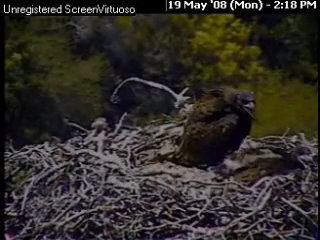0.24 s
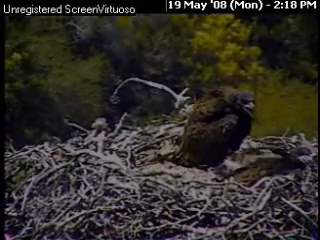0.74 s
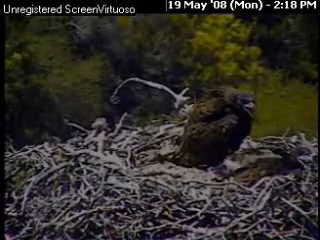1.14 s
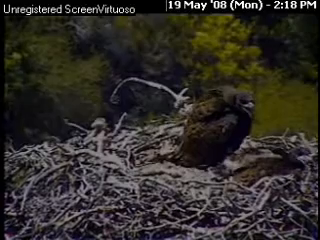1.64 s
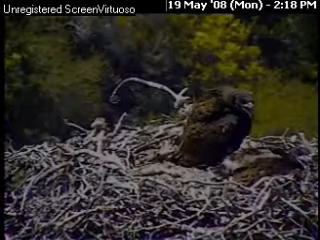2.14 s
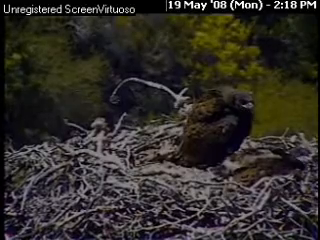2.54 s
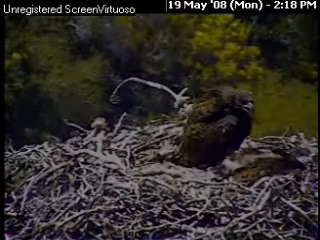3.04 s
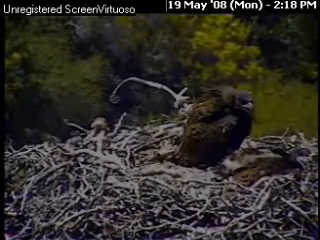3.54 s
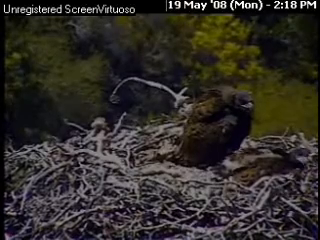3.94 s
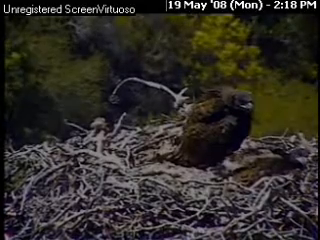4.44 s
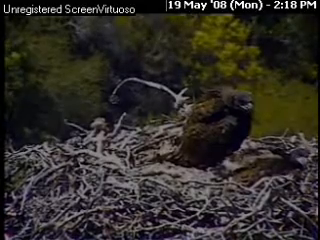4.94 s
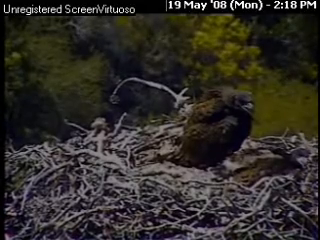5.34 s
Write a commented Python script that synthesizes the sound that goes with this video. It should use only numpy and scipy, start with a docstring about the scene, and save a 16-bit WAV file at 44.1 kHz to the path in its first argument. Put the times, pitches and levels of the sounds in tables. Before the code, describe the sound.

Two eaglets beg with soft gliding whistles and loud, cracking screams, while little birds chirp faintly and airy outdoor noise continues.

```python
"""Two young eagles beg close to a microphone: soft gliding whistles first, then a loud bird's rising screams
(pitch curves with a weak octave), with rasps (tone plus chaotic flutter), cracks and a lingering top note.
The stream stutters in the first two seconds; a last scream comes after 4 s. Between screams small birds
slur and arch (pitch sweeps) and the nest knocks (narrow noise); near the end a thin note and upward hooks.
Blurred far calls waver throughout, over filtered-noise rush and bird blur. A limiter flattens peaks."""
import sys
import numpy as np
from scipy import signal
from scipy.fft import rfft, irfft, next_fast_len
from scipy.io import wavfile
from scipy.ndimage import uniform_filter1d

SR = 44100
rng = np.random.default_rng(int(sys.argv[2]) if len(sys.argv) > 2 else 0)


def digitize_waveform(pressure):
    """Quantize a signal to 16-bit integers and store it at the path in sys.argv[1].

    Rows of a 2-D input are taken as channels; values are limited to [-1, 1].
    """
    field = np.atleast_2d(pressure).T
    bounded = np.clip(field, -1, 1)
    quanta = np.round(bounded * 32767).astype(np.int16)
    wavfile.write(sys.argv[1], SR, quanta)


N = 246078
TIME = np.arange(N) / SR


def gain_of(db):
    """Decibels to amplitude."""
    return 10 ** (np.asarray(db) / 20)


def evened(x):
    """Scales to rms 1."""
    return x / np.sqrt(np.mean(abs(x) ** 2) + 1e-20)


def read(points, hz):
    """Reads a table on a log-frequency axis."""
    f, value = np.transpose(points)
    return np.interp(np.log(hz + 1), np.log(f), value)


def add(mix, start_s, sound):
    """Mixes a sound in at its start time."""
    part = mix[max(round(start_s * SR), 0):][:len(sound)]
    part += sound[:len(part)]


def clock(length_s):
    """Sample times of a sound in seconds, and its progress from 0 to 1."""
    t = np.arange(max(int(length_s * SR), 2)) / SR
    return t, t / t[-1]


def wander(size, rate_hz):
    """Smooth random motion of rms about 1, up to about the given rate."""
    span = next_fast_len(size + 8192)
    low_pass = np.exp(-(np.fft.rfftfreq(span, 1 / SR) / rate_hz) ** 2)
    motion = irfft(rfft(rng.standard_normal(span)) * low_pass, span)
    return evened(motion)[:size]


def angle_of(hz):
    """Running phase of a pitch curve."""
    return 2 * np.pi * np.cumsum(hz) / SR


def fade(size, edge_s):
    """Soft start and end."""
    return signal.windows.tukey(size, min(1, 2 * edge_s * SR / size))


RASP_STEAL = 2.4  # nepers lost by the scream per unit of smoothed rasp amplitude


def eaglets():
    """Rasps steal air from the screams; cracks and soft whistles add freely."""
    rasping = rasps()
    rasp_amplitude = uniform_filter1d(abs(rasping), size=300)
    return screams() * np.exp(-RASP_STEAL * rasp_amplitude) + rasping + cracks() + soft_whistles()


# The loud eaglet's screams, one curve each. Each row: time in seconds, pitch in Hz, level in dB.
SCREAM_CURVES = [
    [(0.42, 3878, -28.5), (0.43, 3916, -15), (0.65, 4096, -6), (0.724, 4168, -5.5), (0.748, 4027, -18.5),
     (0.79, 4112, -0.5), (0.912, 4136, -10), (0.932, 4152, -4), (1.118, 4217, -5), (1.176, 4183, -4),
     (1.19, 4086, -11.5)],
    [(1.79, 3780, -29), (1.842, 3820, -19.5), (1.986, 3758, -23), (2.03, 3920, -13.5), (2.212, 4006, -15.5),
     (2.244, 4083, -9.5), (2.3, 4144, -23), (2.33, 4080, -6.5), (2.37, 4140, -13), (2.49, 4186, -2),
     (2.51, 4164, -14.5)],
    [(4.16, 3932, -21), (4.178, 3940, -20), (4.226, 3940, -18), (4.246, 3890, -25), (4.316, 3976, -18.5),
     (4.344, 3954, -22.5), (4.408, 4070, -8), (4.544, 4138, -16.5), (4.556, 4173, -9.5), (4.57, 4120, -17)],
]
SCREAM_RISE_S = .02


def screams():
    """The loud syrinx driven hard: near-pure tones along pitch and level curves."""
    out = np.zeros(N)
    for curve in SCREAM_CURVES:
        s, hz, db = np.transpose(curve)
        t = np.arange(s[0], s[-1], 1 / SR)
        tone = whistle(np.interp(t, s, hz), np.interp(t, s, db), jitter=0.0017, shimmer=0.12, fuzz_db=-46,
                       octave_db=-1)
        add(out, s[0], tone * np.minimum((t - s[0]) / SCREAM_RISE_S, 1))
    return out


# The voice breaks into a second, rough note. Each row: start in seconds, end in seconds, first pitch in Hz,
# last pitch in Hz, level in dB, roughness 0-1 (before the rough edges are added).
RASP_NOTES = [(0.276, 0.423, 3344, 3486, -32.5, 0.23), (0.489, 0.569, 3530, 3620, -33, 0.5),
              (0.681, 0.783, 3760, 3514, -18, 0.1), (0.824, 0.868, 3640, 3730, -19, 0.5),
              (0.888, 0.92, 3660, 3660, -15, 0), (1.043, 1.129, 3675, 3764, -15, 0.17),
              (1.779, 1.87, 3468, 3667, -25, 0.42), (1.875, 2.042, 3524, 3630, -32.5, .9),
              (2.035, 2.235, 3350, 3670, -43.5, 0.1), (4.152, 4.254, 3640, 3680, -28.5, 0.42),
              (4.23, 4.343, 3770, 3690, -25.5, 0.17), (4.284, 4.385, 3420, 3655, -33, 0.1)]
RASP_WIDTH_HZ = 190  # rate of the chaotic flutter
RASP_SAG_HZ = 79.5  # midway through the note
RASP_EDGE_S, RASP_EDGE_ROUGH = 0.0066, 0.27  # extra roughness as the note breaks in and out


def rasps():
    """All the second notes of the breaking voice."""
    out = np.zeros(N)
    for row in RASP_NOTES:
        add(out, row[0], rasp(*row))
    return out


def rasp(start_s, end_s, first_hz, last_hz, db, rough, octave_db=-28):
    """The second side of the syrinx joins in, part tone and part chaotic flutter."""
    t, u = clock(end_s - start_s)
    n = len(t)
    edge = np.exp(-np.minimum(t, t[::-1]) / RASP_EDGE_S)
    rough = np.clip(rough + RASP_EDGE_ROUGH * edge, 0, 1)
    hz = first_hz + (last_hz - first_hz) * u - RASP_SAG_HZ * np.sin(np.pi * u)
    turn = np.exp(1j * angle_of(hz * (1 + .008 * wander(n, rate_hz=90))))
    chaos = evened(wander(n, RASP_WIDTH_HZ) + 1j * wander(n, RASP_WIDTH_HZ))
    voice = turn * (np.sqrt(1 - rough) + np.sqrt(rough) * chaos)
    sound = evened((voice + gain_of(octave_db) * voice ** 2).real)  # squaring doubles the pitch
    return gain_of(db) * sound * fade(n, edge_s=0.0017)


# The voice collapses as a scream ends.
# Each row: start in seconds, length in seconds, first pitch in Hz, first level in dB.
CRACK_NOTES = [(1.186, 0.049, 3620, -16), (2.509, .072, 3745, -10.5), (4.557, .09, 4025, -15.5)]


def cracks():
    """The failing voice: trembling, fuzzy tones that drop and fade."""
    out = np.zeros(N)
    for s, length_s, hz, db in CRACK_NOTES:
        add(out, s, whistle(*drop(length_s, hz, db), jitter=.012, shimmer=.3, fuzz_db=-20, octave_db=4))
    return out


# Both birds' softer whistles. Each row: start in seconds, end in seconds (before the drop), first pitch in Hz,
# last pitch in Hz, first level in dB, last level in dB, place of the swell 0-1, closing drop in seconds.
SOFT_WHISTLES = [(0, 0.229, 3374, 3494, -18, -13, .36, .05), (.35, 0.435, 3494, 3914, -28, -25.5, 0.41, 0),
                 (0.665, 1.285, 2485, 3287, -35.5, -20, 0.53, 0.053),
                 (1.614, 1.781, 3287, 3156, -24, -30.5, 0.44, 0.013),
                 (2.08, 2.676, 2433, 2625, -39, -35.5, .62, 0.072),
                 (3.488, 3.635, 3750, 3860, -33, -40.5, .35, 0.0075),
                 (3.649, 4.165, 3405, 3558, -37.5, -18.5, 0.46, 0.0018),
                 (3.754, 4.212, 2424, 2510, -47.5, -41, 0.35, .05)]


def soft_whistles():
    """Gentle begging: a scoop, a push of breath and often a closing drop."""
    out = np.zeros(N)
    for row in SOFT_WHISTLES:
        add(out, row[0], whistle(*glide(*row), jitter=0.0041, shimmer=0.17, fuzz_db=-43.5, octave_db=-0.5))
    return out


# Second harmonic of a -22 dB call before the caller's trim. Each row: pitch in Hz, level in dB.
OCTAVE_LEVELS = [(2400, -42.5), (2800, -48.5), (3250, -49), (3550, -51), (3900, -60.5), (4150, -42)]


def whistle(hz, db, jitter, shimmer, fuzz_db, octave_db):
    """A nearly pure tone with a weak octave, a slight tremble and a narrow skirt of air noise."""
    n = len(hz)
    angle = angle_of(hz * (1 + jitter * wander(n, rate_hz=91)))
    skirt = wander(n, rate_hz=1200) * np.sin(angle) + wander(n, rate_hz=650) * np.cos(angle)
    tone = gain_of(db) * (np.sin(angle) + gain_of(fuzz_db) * skirt)
    # the throat resonance swells the fundamental; the octave lies outside it and hardly follows
    octave_level_db = read(OCTAVE_LEVELS, hz) + octave_db + .2 * (db + 22.0) + 2.9 * wander(n, rate_hz=13)
    octave = gain_of(octave_level_db) * np.sin(2 * angle)
    tremble = 1 + shimmer * wander(n, rate_hz=41)
    return np.sqrt(2) * (tone + octave) * tremble * fade(n, edge_s=0.003)


GLIDE_SHARE, SWELL_SHARE = 0.12, 0.049  # shares of the whistle's length that scale the pitch and level pushes
SCOOP_SHARE, SCOOP_DB, SCOOP_S = 0.0496, -11, 0.01168  # starts flat and weak; settling time constant


def glide(start_s, end_s, first_hz, last_hz, first_db, last_db, swell_at, drop_s):
    """Pitch and level of a soft whistle: a scoop, one push that moves both pitch and level, then the drop."""
    t, u = clock(end_s - start_s)
    push = np.tanh((u - swell_at) / (2 * GLIDE_SHARE))
    scoop = np.exp(-t / SCOOP_S)
    hz = first_hz + (last_hz - first_hz) * (push - push[0]) / np.ptp(push)
    hz = hz * (1 - SCOOP_SHARE * scoop)
    db = first_db + (last_db - first_db) / (1 + np.exp((swell_at - u) / SWELL_SHARE)) + SCOOP_DB * scoop
    return np.hstack([[hz, db], drop(drop_s, hz[-1], db[-1])])


DROP_DEPTH, DROP_CURVE, DROP_FADE_DB = .34, .55, -29  # share of pitch lost, cubic share of the fall, fade


def drop(length_s, hz, db):
    """Pitch and level as the air runs out: both fall ever faster."""
    u = np.linspace(0, 1, max(int(length_s * SR), 0))
    fall = (1 - DROP_CURVE) * u + DROP_CURVE * u ** 3
    return hz * (1 - DROP_DEPTH * fall), db + DROP_FADE_DB * u ** 1.62


LINGER_HZ, LINGER_DB, LINGER_DB_PER_S = 4172, -27, -86  # pitch, level before the early boost, decay


def lingering(flutter=0.75, early_db=3, early_s=.025):
    """Echo of a scream's top note: one fixed pitch dies away unevenly."""
    out, t = np.zeros(N), clock(.5)[0]
    for curve in SCREAM_CURVES:
        early = 1 + gain_of(early_db) * np.exp(-t / early_s)  # the first echoes are the strongest
        ring = early * np.sin(2 * np.pi * LINGER_HZ * t) * (1 + flutter * wander(len(t), rate_hz=22))
        decay = gain_of(LINGER_DB + LINGER_DB_PER_S * t)
        add(out, curve[-1][0] - .004, decay * ring * fade(len(t), edge_s=.004))
    return out


def small_birds():
    """Slurs, arches and hooks: each kind of chirp keeps one shape."""
    return slurs() + arches() + hooks()


# Falling chirps. Each row: start in seconds, first pitch in Hz, level in dB.
SLUR_NOTES = [(2.543, 5330, -37.5), (2.631, 5410, -39), (2.731, 5300, -45), (2.826, 5280, -42.5),
              (3.466, 5080, -43)]
SLUR_S, SLUR_FALL = .04, .23  # length, share of pitch lost


def slurs():
    """Chirps whose pitch falls in a straight line."""
    out = np.zeros(N)
    for s, hz, db in SLUR_NOTES:
        add(out, s, chirp(hz * (1 - SLUR_FALL * clock(SLUR_S)[1]), db))
    return out


# Chirps that rise and sink. Each row: start in seconds, length in seconds, top pitch in Hz, level in dB.
ARCH_NOTES = [(3.137, 0.016, 4530, -39), (3.216, 0.03, 4630, -46), (3.284, .046, 4540, -48),
              (3.355, 0.073, 6160, -40), (3.582, 0.03, 3970, -35), (3.687, 0.037, 3945, -33.5),
              (3.803, 0.03, 3950, -33.5), (3.838, .062, 5800, -43), (3.918, 0.034, 3880, -33),
              (4.044, 0.043, 3880, -31)]
ARCH_TOP, ARCH_BEND = .53, 0.374  # place of the top 0-1, curvature


def arches():
    """Chirps whose pitch follows a parabola."""
    out = np.zeros(N)
    for s, length_s, top_hz, db in ARCH_NOTES:
        u = clock(length_s)[1]
        add(out, s, chirp(top_hz * (1 - ARCH_BEND * (u - ARCH_TOP) ** 2), db))
    return out


# Chirps that hold a note and flick upward.
# Each row: start in seconds, length in seconds, held pitch in Hz, last pitch in Hz, level in dB.
HOOK_NOTES = [(5.11, .047, 3556, 4750, -26), (5.166, 0.0213, 3526, 4380, -28.5),
              (5.248, .037, 3560, 4990, -24.5), (5.301, 0.023, 3620, 4640, -26),
              (5.384, 0.013, 3120, 3610, -41.5), (5.536, 0.025, 3580, 4270, -44)]
FLICK_S, HOOK_SAG_HZ = 0.00858, 180  # time constant of the flick, dip before it
HOOK_PEAK_S, HOOK_FADE_DB_PER_S = 0.004, -200  # loudest this long before the end, fade on both sides


def hooks():
    """Chirps that sag, then flick up exponentially, loudest near the end."""
    out = np.zeros(N)
    for s, length_s, held_hz, last_hz, db in HOOK_NOTES:
        t, u = clock(length_s)
        left_s = t[::-1]
        flick = (last_hz - held_hz) * np.exp(-left_s / FLICK_S)
        hz = held_hz + flick - HOOK_SAG_HZ * np.sin(np.pi * u ** 2)
        add(out, s, chirp(hz, db + HOOK_FADE_DB_PER_S * abs(left_s - HOOK_PEAK_S), quaver=.02))
    return out


def chirp(hz, db, quaver=0.0074):
    """A quick sweep with a slight random quaver in pitch."""
    tone = np.sin(angle_of(hz * (1 + quaver * wander(len(hz), rate_hz=750))))
    return gain_of(db) * evened(tone * fade(len(hz), edge_s=0.0036))


# One thin whistle: start in seconds, end in seconds, first pitch in Hz, last pitch in Hz,
# first level in dB, last level in dB, place of the swell 0-1, closing drop in seconds.
SONG_NOTE = (4.87, 5.09, 5560, 5920, -46, -42.5, .25, 0)


def songbird():
    """One thin gliding note, then a faint blurred hold near its last pitch."""
    out = np.zeros(N)
    add(out, SONG_NOTE[0], whistle(*glide(*SONG_NOTE), jitter=0.0043, shimmer=0.3, fuzz_db=-37, octave_db=-73))
    return out + gain_of(-5) * trees(out, t60=2.5)


# Wavering far calls; the first row is the dying echo of an earlier scream.
# Each row: start in seconds, length in seconds, mean pitch in Hz, level in dB before the two gains below.
FAR_NOTES = [(0, 0.088, 4260, -39), (0, 0.6, 3600, -32.5), (1.2, 0.57, 3835, -42.5),
             (1.76, 0.39, 3628, -32.5), (2.55, 0.14, 3450, -43.5), (2.8, 0.22, 3360, -41.5),
             (3.25, .28, 4490, -46.5), (3.53, .17, 3540, -40), (4.55, 0.1, 3750, -43),
             (5.42, 0.14, 3680, -34.5)]


def far_birds(waver=0.054, direct_db=-5, blurred_db=-1):
    """Wavering tones, each mixed with a stronger blurred copy of itself."""
    out = np.zeros(N)
    for s, length_s, hz, db in FAR_NOTES:
        n = int(length_s * SR)
        tone = np.sin(angle_of(hz * (1 + waver * wander(n, rate_hz=91))))
        add(out, s, gain_of(db) * evened(tone * fade(n, edge_s=0.013)))
    return gain_of(direct_db) * out + gain_of(blurred_db) * trees(out, t60=0.93)


def trees(x, t60):
    """Scattered echoes from the nest and the woods around it: sparse random taps that die away."""
    t = TIME[:SR]
    hits = rng.random(SR) < 1500 / SR  # about 1500 echoes per second
    taps = rng.standard_normal(SR) * hits * gain_of(-60 * t / t60) * (t > .008)
    return signal.fftconvolve(x, taps / np.linalg.norm(taps))[:N]


# Soft knocks on the nest. Each row: time in seconds (midway up the rise), ring in Hz, peak level in dB.
NEST_KNOCKS = [(2.859, 933, -36), (3.747, 488, -37), (3.76, 838, -44), (4.99, 720, -44), (5.41, 120.5, -49),
               (5.511, 192, -42)]


def knocks(ring_s=0.01438):
    """Dull, quickly dying knocks in the heap of sticks: narrow noise around the ring pitch."""
    out, t = np.zeros(N), np.arange(SR // 8) / SR
    for s, hz, db in NEST_KNOCKS:
        angle = 2 * np.pi * hz * t
        body = wander(len(t), hz / 3) * np.sin(angle) + wander(len(t), hz / 3) * np.cos(angle)
        envelope = t / ring_s * np.exp(1 - t / ring_s)
        add(out, s - ring_s / 2, gain_of(db) * body * envelope)
    return out


FRAME_HZ, FRAME_S = np.fft.rfftfreq(1024, 1 / SR), np.arange(N // 256 + 5) * 256 / SR


def patchy_noise(db, patch_db):
    """Noise of rms 1 from random short-time spectra with drifting patches."""
    a, b, patches = rng.standard_normal((3, len(FRAME_S), len(FRAME_HZ)))
    patches = uniform_filter1d(uniform_filter1d(patches, size=8, axis=0), size=6, axis=1)
    spectra = (a + 1j * b) * gain_of(db + patch_db * evened(patches))
    return evened(signal.istft(spectra.T, nperseg=1024, noverlap=768)[1][:N])


# Spectrum of the outdoor air. Each row: frequency in Hz, relative density in dB.
AIR_COLOUR = [(20, -6), (45, 2), (80, -5), (150, -6.5), (300, -12.5), (470, -7), (850, -11), (1150, -16),
              (1400, -27), (2600, -25.5), (3500, -20.5), (4600, -17), (5600, -28), (7000, -29),
              (10000, -36), (12900, -40.5)]
# Swell of the rush below 1300 Hz, about its mean. Each row: time in seconds, level in dB.
RUSH_SWELL = [(0, -47), (1.0, -43), (1.5, -43), (2.2, -42), (2.7, -45.5), (4, -46), (5.58, -46.5)]
# Wind on the microphone, strongest below 230 Hz. Each row: time in seconds, bass boost in dB.
WIND_BASS = [(0, 3.5), (.6, 0.5), (1.3, -1), (2.4, -2), (2.8, 4), (3.2, 0.5), (3.75, 5.5), (4.4, 2),
             (5.3, 6)]
AIR_DB = -38.5


def rush(patchy_db=1.52):
    """Outdoor rush: shaped noise with gusty bass and thin hiss."""
    swell = np.interp(FRAME_S, *np.transpose(RUSH_SWELL))
    swell = np.outer(swell - swell.mean(), FRAME_HZ < 1300)
    wind = np.interp(FRAME_S, *np.transpose(WIND_BASS))
    wind = np.outer(wind, 1 / (1 + (FRAME_HZ / 230) ** 2))
    return gain_of(AIR_DB) * patchy_noise(read(AIR_COLOUR, FRAME_HZ) + swell + wind, patchy_db)


# Spectrum of the blur. Each row: frequency as a multiple of the centre, relative level in dB.
BLUR_COLOUR = [(.72, -38), (.92, 1.5), (1.001, -4), (1.07, 5.5), (1.352, -13.5), (1.998, -46)]
CHORUS_HZ, CHORUS_DB = 3860, -55


def chorus(patchy_db=2):
    """Steady blur of the most distant birds: noise shaped around one centre."""
    colour = np.interp(FRAME_HZ / CHORUS_HZ, *np.transpose(BLUR_COLOUR))
    return gain_of(CHORUS_DB) * patchy_noise(colour, patchy_db)


def scene():
    """Eaglets close and nearly dry, small birds further off."""
    near, far = eaglets(), small_birds()
    near_echo = gain_of(-25) * trees(near, t60=1.2)
    far_echo = gain_of(-5.5) * trees(far, t60=0.28)
    birds = near + near_echo + lingering() + far + far_echo + songbird() + far_birds()
    return (birds + knocks() + rush() + chorus())[None]


# The stream replays older sound. Each row: start in seconds, length in seconds, replayed share 0-1.
STREAM_STUTTERS = [(.0821, .0002, 1), (.2742, .008, 1), (.7821, .0001, .35), (.8742, .008, 1),
                   (1.868, .014, 1)]
BUFFER_S = .1  # age of the replayed sound; before this time it wraps to the end
CEILING, OFFSET, EDGE_HZ = .65, .334, 12900  # limiter and offset as shares of full scale, low-pass edge


def record(dry, grit_db=-43, grit_floor=0.38, bend_db=-30):
    """A fast limiter that adds bright grit when driven hard, stream stutters, the band limit, a steady offset."""
    swing = abs(signal.hilbert(dry[0]))
    held = dry[0] * (1 + (swing / CEILING) ** 6) ** (-1 / 6)
    held = held - gain_of(bend_db) * held ** 3  # a slight bend mixes the two voices into thin high tones
    overload = np.clip((swing / CEILING - .85) / .45, 0, 1)
    high_pass = signal.butter(2, 8000, "high", fs=SR, output="sos")
    treble = signal.sosfilt(high_pass, rng.standard_normal(N))
    held = held + gain_of(grit_db) * np.sqrt(overload) * (treble + grit_floor * rng.standard_normal(N))
    stuck = sum(share * ((TIME >= s) & (TIME < s + length_s)) for s, length_s, share in STREAM_STUTTERS)
    stream = (1 - stuck) * held + stuck * np.roll(held, round(BUFFER_S * SR))
    low_pass = signal.firwin(511, EDGE_HZ, window=("kaiser", 9), fs=SR)
    return signal.oaconvolve(stream, low_pass, "same")[None] + OFFSET


dry = scene()
out = record(dry)
digitize_waveform(out)
```